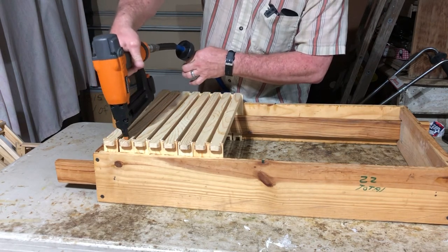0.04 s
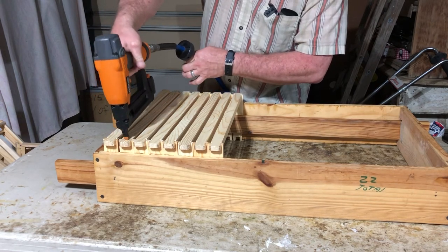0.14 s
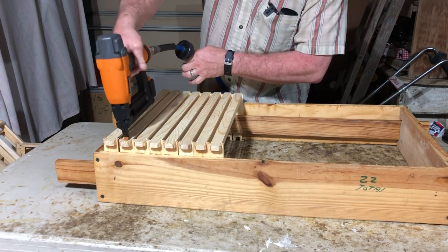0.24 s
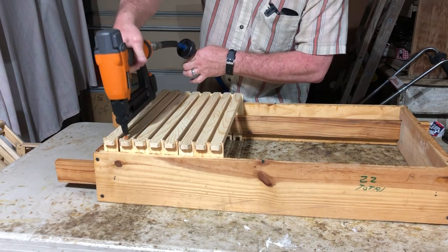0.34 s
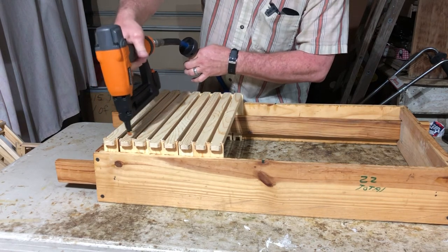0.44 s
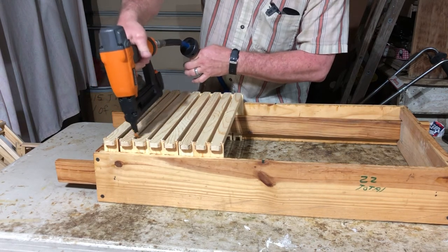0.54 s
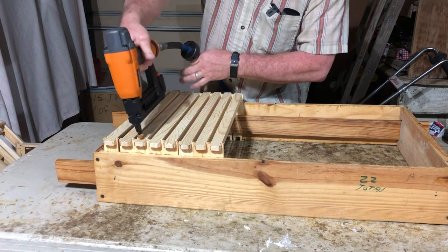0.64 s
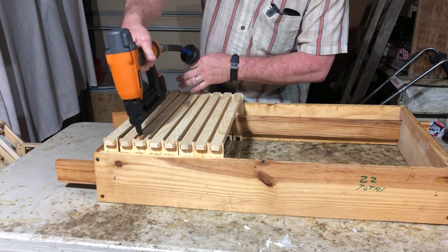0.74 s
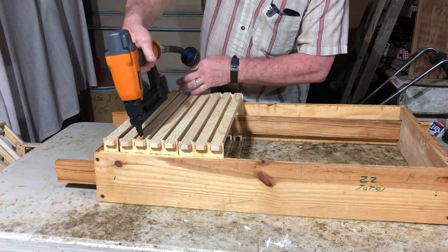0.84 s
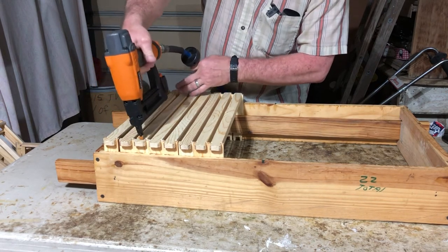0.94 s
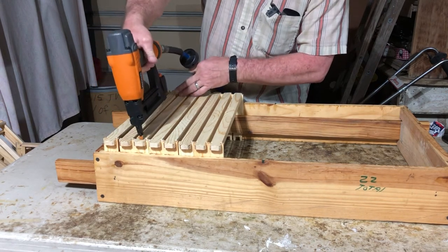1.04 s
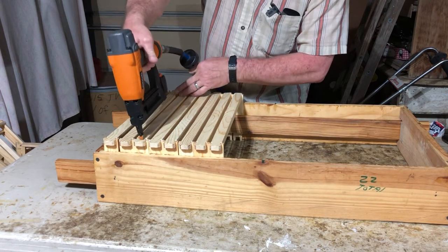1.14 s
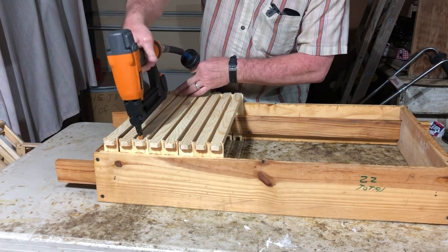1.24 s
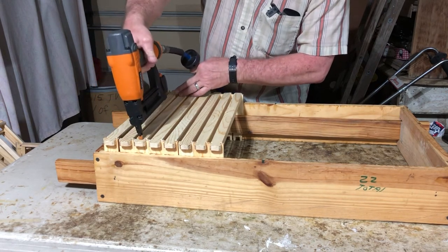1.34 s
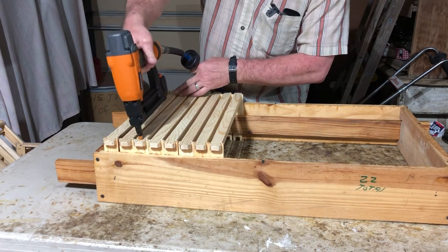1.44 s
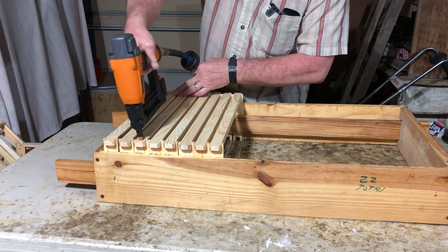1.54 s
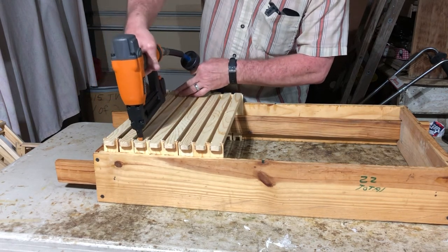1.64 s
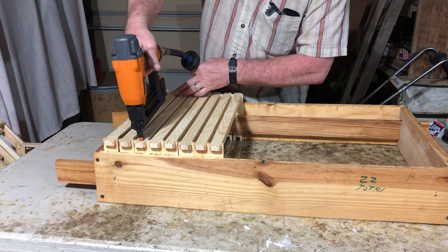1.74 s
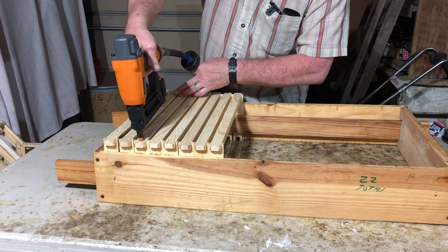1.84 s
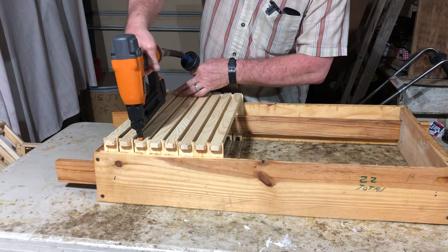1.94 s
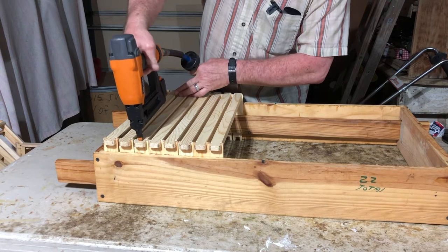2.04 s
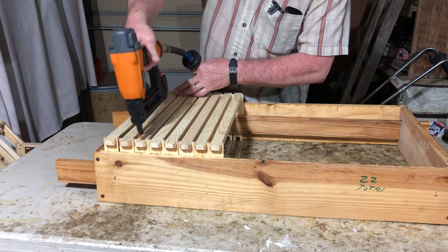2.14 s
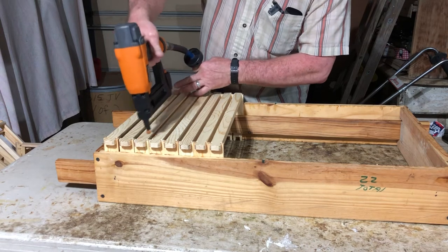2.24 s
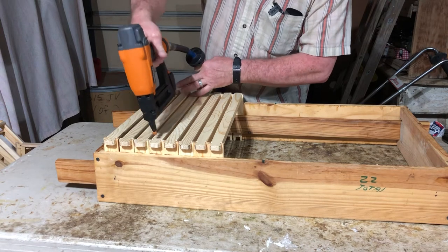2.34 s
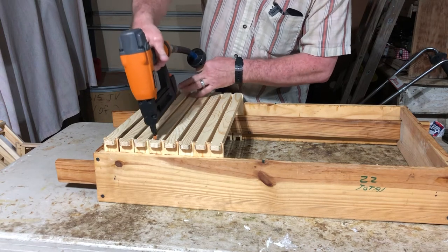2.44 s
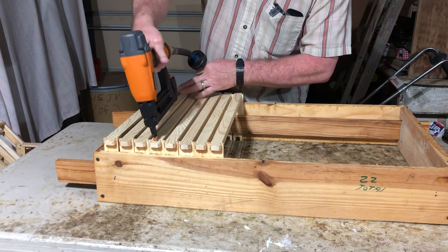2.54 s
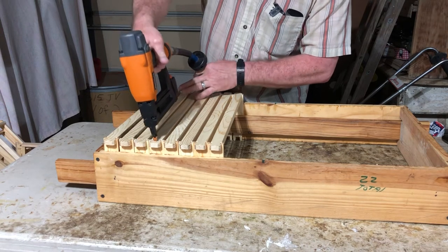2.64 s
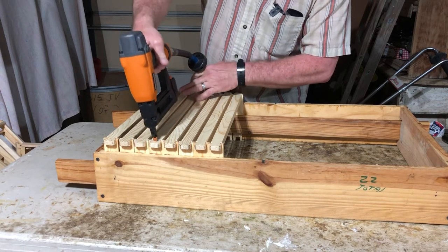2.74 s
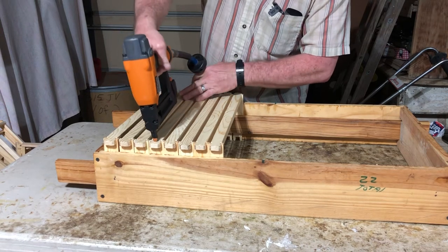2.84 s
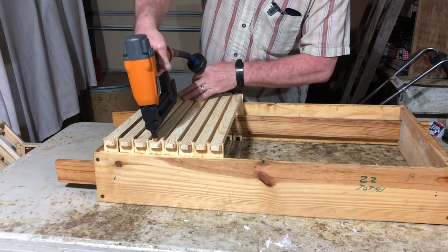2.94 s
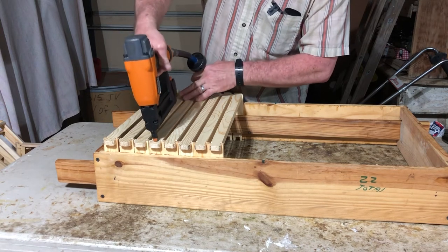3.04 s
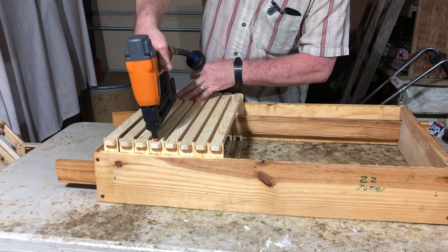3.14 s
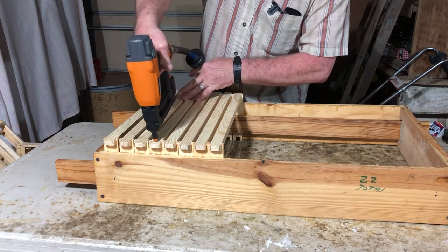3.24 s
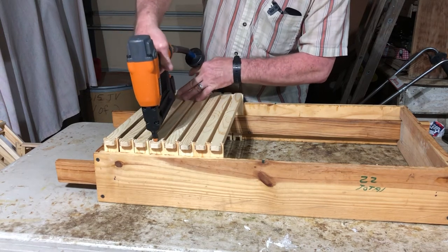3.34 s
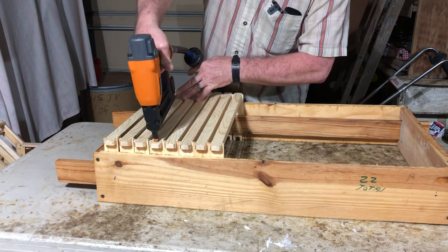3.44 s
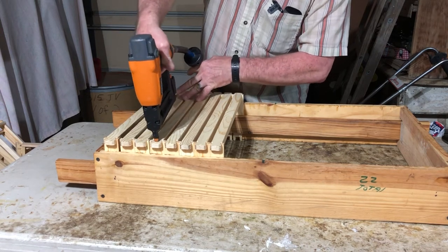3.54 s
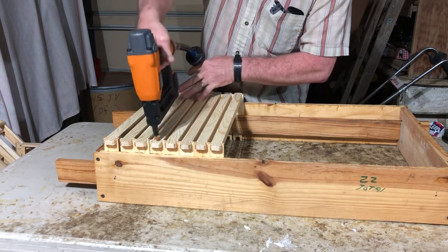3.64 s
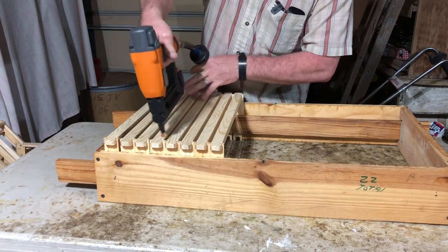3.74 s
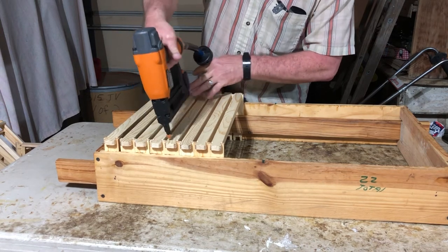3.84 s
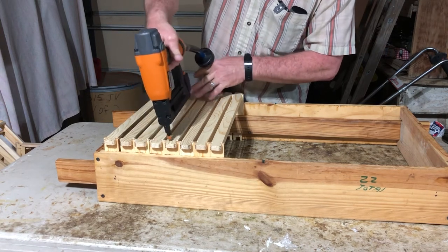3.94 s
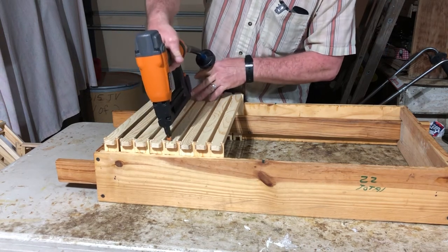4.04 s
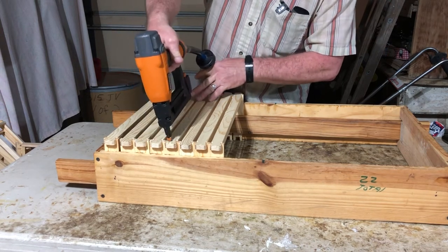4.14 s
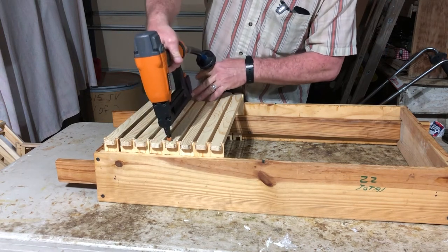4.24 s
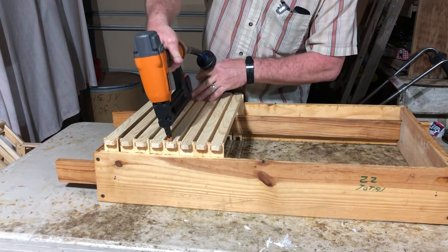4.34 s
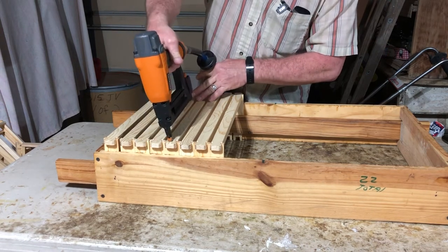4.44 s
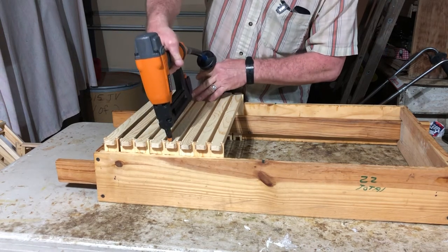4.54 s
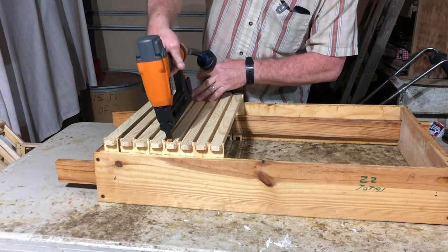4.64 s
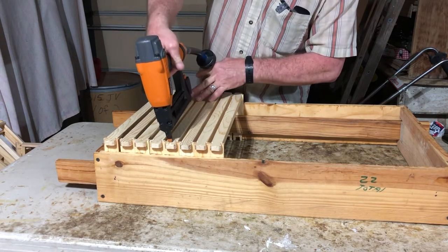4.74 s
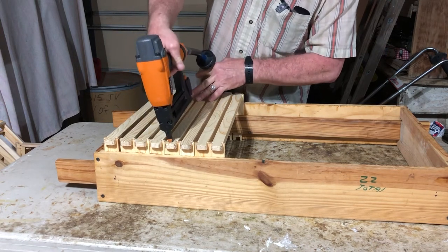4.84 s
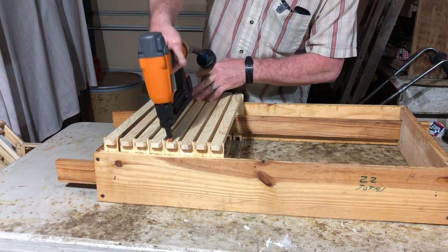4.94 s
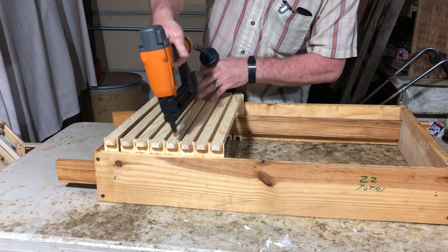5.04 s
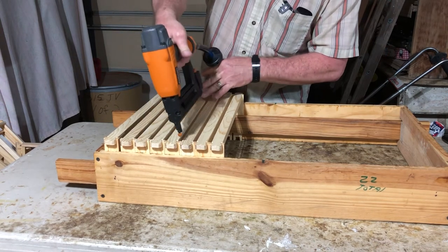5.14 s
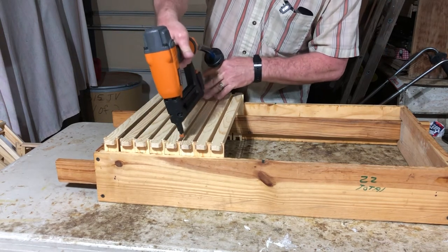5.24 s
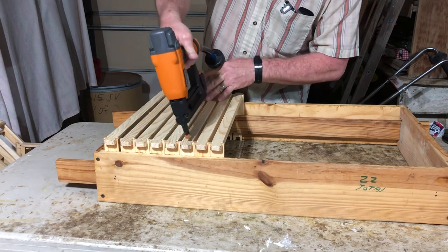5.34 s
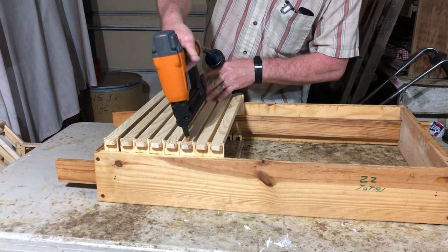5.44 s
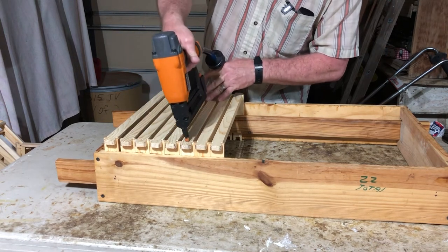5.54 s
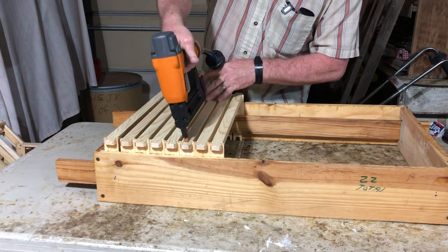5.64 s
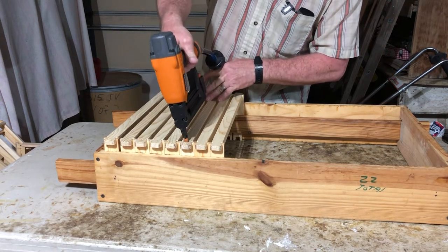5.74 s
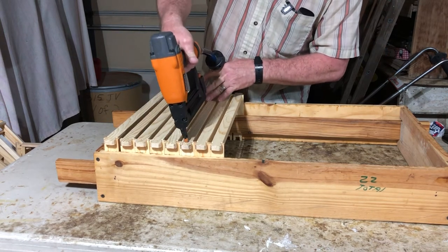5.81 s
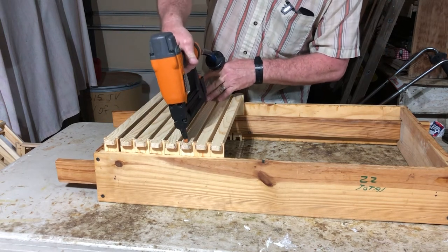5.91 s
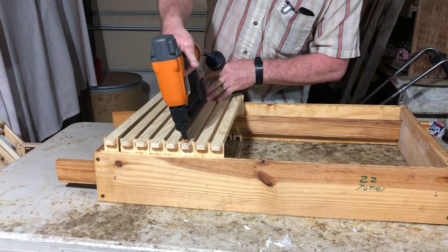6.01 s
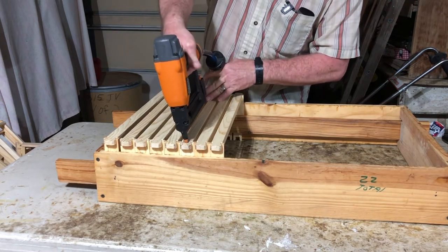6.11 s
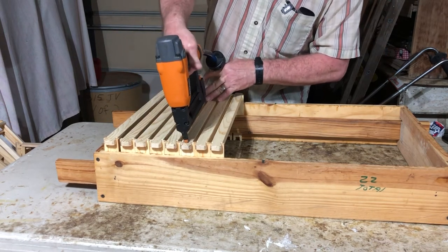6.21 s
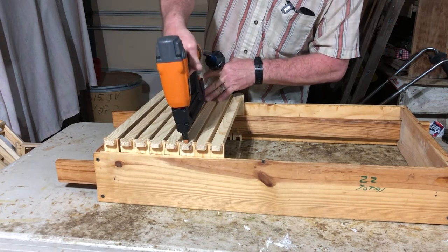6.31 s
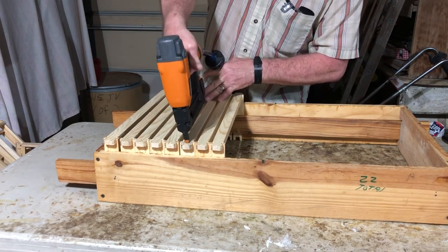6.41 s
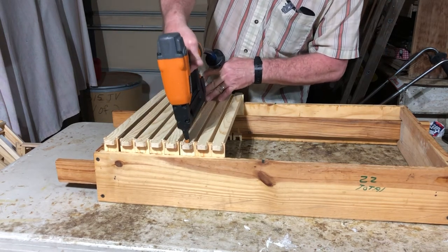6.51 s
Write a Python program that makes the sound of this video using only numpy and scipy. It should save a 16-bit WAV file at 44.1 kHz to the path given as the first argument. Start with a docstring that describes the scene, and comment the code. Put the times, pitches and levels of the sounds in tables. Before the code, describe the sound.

A pneumatic stapler fires five times into wood, each hard bang wrapped in a short air hiss, with light clicks between shots.

```python
"""A short hiss and a hard bang, five times: a pneumatic stapler fastens wooden frames in a garage.
Each shot: the valve hisses, the driver slams into frames in a box jig, air vents, the trigger snaps back.
Between shots, over a faint hum, the safety nose clicks and is set down on the next frame.
The blows overload the microphone."""
import sys
import numpy as np
from scipy import signal
from scipy.fft import rfft, irfft
from scipy.io import wavfile
from scipy.ndimage import uniform_filter1d

SR = 44100
rng = np.random.default_rng(int(sys.argv[2]) if len(sys.argv) > 2 else 0)


def store_pcm(level_fs):
    """Save levels as 16-bit WAV."""
    pcm = np.round(np.clip(level_fs, -1, 1) * 32767).astype(np.int16)
    wavfile.write(sys.argv[1], SR, np.atleast_2d(pcm).T)


N = 289895
T = np.arange(SR) / SR  # seconds since an event

# Noise spectra. Each row: frequency in Hz, relative density in dB.
ROOM_AIR_SPECTRUM = [(20, -26), (40, -18), (58, -4), (120, -3), (200, -9), (400, -11), (800, -20),
                     (1400, -22), (2500, -27), (4500, -28), (8000, -38), (16000, -42)]
BUMP_SPECTRUM = [(25, -26), (45, -11), (65, -2), (130, -2), (220, 0), (520, -3), (800, -10), (1300, -19),
                 (2200, -27), (6000, -42), (16000, -60)]
CLICK_SPECTRUM = [(500, -23.5), (1900, -16.5), (2900, -5.5), (4000, -2), (5000, -5.5), (6500, -13.5),
                  (11000, -19), (16000, -27.5)]
VALVE_SPECTRUM = [(40, -25.5), (170, -5), (450, -13.5), (2000, -18), (2900, -1.5), (4300, -1), (5000, -0.5),
                  (6200, 0.5), (7500, -7), (10000, -6.5), (11500, -1), (13500, -6), (16000, -12.5)]
EXHAUST_SPECTRUM = [(100, -13.5), (600, 0), (2000, -0.5), (4500, 2.5), (7000, -2), (10000, -4),
                    (13800, -4.5), (16000, -6.5)]
THUD_SPECTRUM = [(25, -34.5), (45, -27.5), (65, -10.5), (125, -10.5), (170, -0.5), (400, -1.5), (850, -7),
                 (1300, -11), (2200, -20), (6000, -30.5), (16000, -46.5)]
CRACK_SPECTRUM = [(40, -20), (200, -10), (900, -0.5), (1800, -5), (2600, 2), (4500, -1), (7000, -8),
                  (10000, -18), (16000, -20)]
# Damped modes. Each row: frequency in Hz, relative level in dB, t60 in seconds.
# Low boom of the garage (63.5 Hz room mode), then the ringing of frames and jig.
ROOM_AND_WOOD_MODES = [(63.5, -13, .4), (102.6, -21.5, .25), (158, -4.5, .21), (185, -5, .26),
                       (248, -7.5, .23), (294, -6, .21), (345, -4.5, .18), (370, -3, .22), (435, -4.5, .22),
                       (588, -9, .17), (612, -6.5, .27), (700, -8.5, .12), (776, -7, .28), (834, -7, .28),
                       (905, -7, .28), (1260, -12, .24), (1605, -15, .22)]
# Modes of the stapler's parts. Each row: frequency in Hz, relative level in dB, t60 in seconds.
STEEL_MODES = [(1330, -25, .3), (2318, -24, .33), (2580, -20, .32), (3690, -25, .45), (4249, -24, .34),
               (4860, -27, .32)]
MAGAZINE_SPRING_MODES = [(1453, -61, 2.2), (2110, -68, 2), (2487, -71, 2), (3784, -68, 1.9),
                         (4700, -70, 1.9)]
TRIGGER_MODES = [(3200, -8, .009), (4000, -1, .012), (4550, -7, .008)]
# Mains hum. Each row: frequency in Hz, rms level in dB.
HUM_PARTIALS = [(60, -73), (119.5, -66.5), (241, -83), (360, -80.5)]
# Garage reverberation. Each row: frequency in Hz, t60 in seconds.
GARAGE_DECAY = [(60, 0.55), (250, .32), (700, 0.36), (1500, 0.43), (4000, 0.41), (7000, 0.45),
                (11000, 0.33), (16000, 0.34)]
# Exhaust port resonances. Each row: centre in Hz, width in Hz, lift in dB.
PORT_RESONANCES = [(5250, 200, 2.5), (5868, 950, 2.5), (8560, 600, 2), (12800, 400, 4.5)]
# Safety nose clicks. Each row: start in seconds, relative click level in dB, pitch in Hz,
# relative level of the tap on the wood in dB.
SAFETY_CLICKS = [(0.7193, -40, 3220, -55.5), (0.8005, -46.5, 5980, -86), (0.8594, -46.5, 4820, -70),
                 (0.9497, -57.5, 3470, -59.5), (1.2879, -46, 4740, -58), (2.4542, -36, 4310, -54),
                 (2.6554, -46.5, 3100, -69.5), (3.1275, -30.5, 3220, -59.5), (4.0238, -36.5, 4270, -53),
                 (4.4256, -48, 5370, -59.5), (4.5907, -47, 3820, -82), (5.4301, -21.5, 3650, -45),
                 (5.48, -38.5, 3760, -54.5), (5.5612, -38.5, 5040, -62.5)]
# Nose set on a frame. Each row: start in seconds, relative level in dB, pitch factor (firm is higher).
NOSE_LANDINGS = [(.001, -47, 0.9), (.385, -37.5, 0.72), (1.448, -36.5, .65), (2.7729, -44.5, .5),
                 (4.5089, -38, 0.88)]
# Trigger squeezes. Each row: pull in seconds, release in seconds, relative snap level in dB.
TRIGGER_SQUEEZES = [(.085, .2832, -11), (1.7552, 2.0699, -5), (3.338, 3.5705, -5.5), (4.7232, 4.9075, -6),
                    (6.2465, 6.4468, -9)]
# Shots. Each row: valve opening and strike in seconds, relative levels of valve, blow and exhaust in dB,
# bending note of the struck frame in Hz, its relative level in dB.
STAPLE_SHOTS = [(0.107, .1420, 0.5, -1, 0.5, 185.2, 0.5), (1.783, 1.829, 1.5, -1, -2.5, 254.7, -8),
                (3.353, 3.384, -0.5, -1.5, 0, 358.4, 4), (4.737, 4.771, 0.5, -3, 1.5, 372, 2.5),
                (6.256, 6.2878, -1, -1.5, 2.5, 191.7, -1)]


def amp(db):
    """Decibels to gain."""
    return 10 ** (np.asarray(db) / 20)


def log_interp(points, hz):
    """Read (Hz, value) points on a log frequency axis."""
    points_hz, values = np.transpose(points)
    return np.interp(np.log(hz + 1), np.log(points_hz + 1), values)


def noise(spectrum, size=SR, shift=1):
    """Shaped noise of rms 1, transposed by the factor shift."""
    hz = np.fft.rfftfreq(size, 1 / SR)
    shaped = irfft(rfft(rng.standard_normal(size)) * amp(log_interp(spectrum, hz / shift)), size)
    return shaped / np.sqrt(np.mean(shaped ** 2) + 1e-20)


def fade(t60_s, t=T):
    """Exponential decay, 60 dB in t60_s."""
    return np.exp(-np.log(1000) * t / t60_s)


def burst(rise_s, hold_s, t60_s):
    """Envelope: linear rise, decay from hold_s on."""
    return np.minimum(T / rise_s, 1) * fade(t60_s, np.maximum(T - hold_s, 0))


def ring(modes, scatter_db, detune=0):
    """Damped modes with random strength, phase and optional detuning per strike."""
    hz, db, t60_s = np.transpose(modes)[:, :, None]
    gain = amp(db + scatter_db * rng.standard_normal(hz.shape))
    hz = hz * (1 + detune * rng.standard_normal(hz.shape))
    return np.sum(gain * fade(t60_s) * np.sin(2 * np.pi * (hz * T + rng.random(hz.shape))), 0)


def add(track, start_s, sound):
    """Mix a sound into the track."""
    start = max(round(start_s * SR), 0)
    part = sound[:max(N - start, 0)]
    track[start:start + len(part)] += part


def garage_burst(spectrum, envelope, wet_db, shift=1, build_s=0.014):
    """Noise burst; the room stores its energy and returns a diffuse tail."""
    hz, t, spectrogram = signal.stft(noise(spectrum, shift=shift), SR, nperseg=256)
    power = np.interp(t, T, uniform_filter1d(envelope ** 2, size=128))
    t60_s = log_interp(GARAGE_DECAY, hz)[:, None]
    decay = (fade(t60_s, t) * np.minimum(t / build_s, 1)) ** 2
    stored = signal.fftconvolve(power[None], decay / decay.sum(1).mean(), axes=1)[:, :len(t)]
    tail = signal.istft(spectrogram * np.sqrt(np.abs(stored)), SR, nperseg=256)[1][:SR]
    return noise(spectrum, shift=shift) * envelope + amp(wet_db) * tail


def background(air_db=-68):
    """Quiet room air and mains hum."""
    t = np.arange(N) / SR
    hum = sum(amp(db) * np.sqrt(2) * np.sin(2 * np.pi * (hz * t + rng.random()))
              for hz, db in HUM_PARTIALS)
    return amp(air_db) * noise(ROOM_AIR_SPECTRUM, size=N) + hum


def wood_knock(shift, t60_s, ring_db):
    """Soft contact: a dull bump rings the wood and the room mode."""
    envelope = burst(rise_s=0.0039, hold_s=0.012, t60_s=t60_s)
    bump = garage_burst(BUMP_SPECTRUM, envelope, wet_db=-5, shift=shift)
    ringing = ring(ROOM_AND_WOOD_MODES, scatter_db=1.5) * burst(rise_s=0.0007, hold_s=0.003, t60_s=0.81)
    return bump + amp(ring_db) * ringing


def frame_taps(taps_per_s=1.2):
    """Loose frames tap each other faintly at random times."""
    out = np.zeros(N)
    for when, strength, pitch in rng.random((round(taps_per_s * N / SR), 3)):
        tap = wood_knock(1 + pitch, t60_s=0.04, ring_db=-13.5)
        add(out, when * N / SR, amp(-59 + 4 * strength) * tap)
    return out


def steel_click(hz, t60_s, tick_db, wet_db):
    """A small steel part hits its stop: noise tick and short ping."""
    shift = hz / 4000  # both click tables peak at 4000 Hz
    envelope = burst(rise_s=0.0004, hold_s=0.0011, t60_s=t60_s)
    tick = garage_burst(CLICK_SPECTRUM, envelope, wet_db, shift)
    ping = ring(np.multiply(TRIGGER_MODES, [shift, 1, 1]), scatter_db=4.5) * np.minimum(T / 0.0002, 1)
    return amp(tick_db) * tick + amp(-5) * ping


def safety_nose():
    """As the tool moves, the sprung nose hits its stop and grazes the wood."""
    out = np.zeros(N)
    for start_s, click_db, hz, tap_db in SAFETY_CLICKS:
        add(out, start_s, amp(click_db - 1.5) * steel_click(hz, t60_s=0.028, tick_db=-11, wet_db=-10.5))
        add(out, start_s, amp(tap_db + 1) * wood_knock(shift=2.2, t60_s=0.025, ring_db=-21))
    return out


def nose_landings(settle_s=0.037, settle_db=-9):
    """The nose lands, rocks once and touches again; soft contacts are lower and longer."""
    out = np.zeros(N)
    for start_s, db, shift in NOSE_LANDINGS:
        for delay_s, step_db in [(0, 0), (settle_s, settle_db)]:
            tick = steel_click(hz=4060, t60_s=0.02, tick_db=-11, wet_db=-7)
            knock = wood_knock(shift, t60_s=0.055 / shift, ring_db=-15.5)
            add(out, start_s + delay_s, amp(db + step_db) * (knock + amp(-2.5) * tick))
    return out


def trigger(catch_lead_s=0.0076, catch_db=-15):
    """The trigger ticks when pulled; released, it slips its catch and snaps back."""
    out = np.zeros(N)
    for pull_s, release_s, snap_db in TRIGGER_SQUEEZES:
        add(out, pull_s, amp(-37.5) * steel_click(hz=4570, t60_s=0.023, tick_db=-8.5, wet_db=-9))
        for lead_s, step_db in [(catch_lead_s, catch_db), (0, 0)]:
            snap = steel_click(hz=3953, t60_s=0.01, tick_db=-12, wet_db=-10)
            add(out, release_s - lead_s, amp(snap_db + step_db) * snap)
    return out


def valve(opening_s=0.0046, jolt_hz=190):
    """The hiss swells as the valve opens; its jolt nudges the wood."""
    opening = np.minimum(T / opening_s, 1) ** 2
    envelope = opening * burst(rise_s=0.002, hold_s=0.0086, t60_s=0.11)
    hiss = garage_burst(VALVE_SPECTRUM, envelope, wet_db=-2)
    jolt = np.sin(2 * np.pi * jolt_hz * T) * opening * fade(t60_s=0.034)
    return hiss + amp(-0.5) * jolt


def exhaust():
    """The piston returns; spent air vents through the resonant port."""
    puff = garage_burst(EXHAUST_SPECTRUM, burst(rise_s=0.028, hold_s=0.037, t60_s=0.059), wet_db=-7)
    hz = np.fft.rfftfreq(SR, 1 / SR)
    response = 1
    for centre_hz, width_hz, lift_db in PORT_RESONANCES:
        damping = 1j * hz * width_hz
        response += (amp(lift_db) - 1) * damping / (centre_hz ** 2 - hz ** 2 + damping)
    return irfft(rfft(puff) * response, SR)


def wood_blow(frame_hz, frame_db):
    """The blow excites room mode, frames and hollow jig; the struck frame rings its bending note."""
    thud = garage_burst(THUD_SPECTRUM, burst(rise_s=0.0017, hold_s=0.045, t60_s=0.18), wet_db=-8.5)
    boom = ring(ROOM_AND_WOOD_MODES, scatter_db=3, detune=0.015) * np.minimum(T / 0.006, 1)
    bend = np.sin(2 * np.pi * frame_hz * T) * burst(rise_s=0.007, hold_s=0.027, t60_s=0.12)
    return amp(-7.5) * thud + amp(-10) * (boom + amp(frame_db) * bend)


def piston_crack():
    """The piston bottoms out with a hard crack."""
    return garage_burst(CRACK_SPECTRUM, burst(rise_s=0.0061, hold_s=0.008, t60_s=0.02), wet_db=-6.5)


def shots(crack_delay_s=0.0005, exhaust_delay_s=0.013):
    """Air fills the cylinder, the blow rings room, wood, steel and magazine spring, then air vents."""
    out = np.zeros(N)
    for valve_s, strike_s, valve_db, blow_db, exhaust_db, frame_hz, frame_db in STAPLE_SHOTS:
        add(out, valve_s, amp(valve_db - 22) * valve())
        add(out, strike_s, amp(blow_db) * wood_blow(frame_hz, frame_db))
        add(out, strike_s + crack_delay_s, amp(blow_db) * piston_crack())
        add(out, strike_s, amp(blow_db - 6.5) * ring(STEEL_MODES, scatter_db=3, detune=0.004))
        add(out, strike_s, ring(MAGAZINE_SPRING_MODES, scatter_db=2))
        add(out, strike_s + exhaust_delay_s, amp(exhaust_db - 19) * exhaust())
    return out


def scene():
    """Mono sum at the microphone."""
    return (shots() + trigger() + nose_landings() + safety_nose() + frame_taps() + background())[None]


def record(dry, ceiling=0.6, hardness=5, low_cut_hz=30, treble_hz=1500, treble_mix_db=-12, top_hz=15900):
    """The input saturates on the blows; then low cut, treble lift and band limit."""
    clipped = dry / (1 + np.abs(dry / ceiling) ** hardness) ** (1 / hardness)
    body = signal.sosfilt(signal.butter(1, low_cut_hz, "high", fs=SR, output="sos"), clipped)
    treble = signal.sosfilt(signal.butter(1, treble_hz, "high", fs=SR, output="sos"), body)
    band_limit = signal.firwin(301, top_hz, window="blackman", fs=SR)
    return signal.fftconvolve(body + amp(treble_mix_db) * treble, band_limit[None], "same")


dry = scene()
out = record(dry)
store_pcm(out)
```